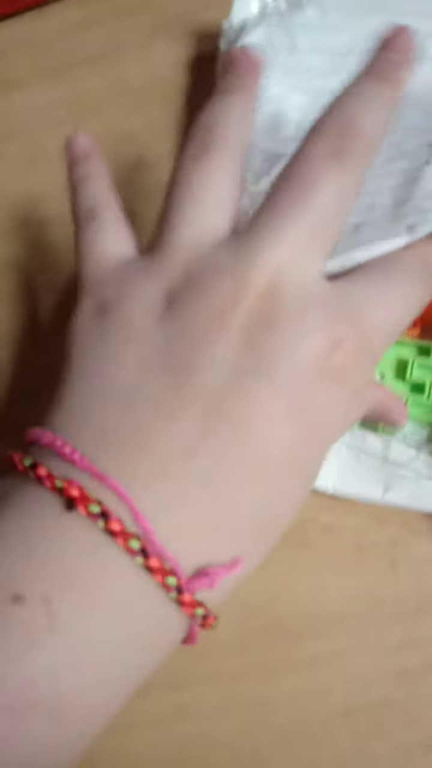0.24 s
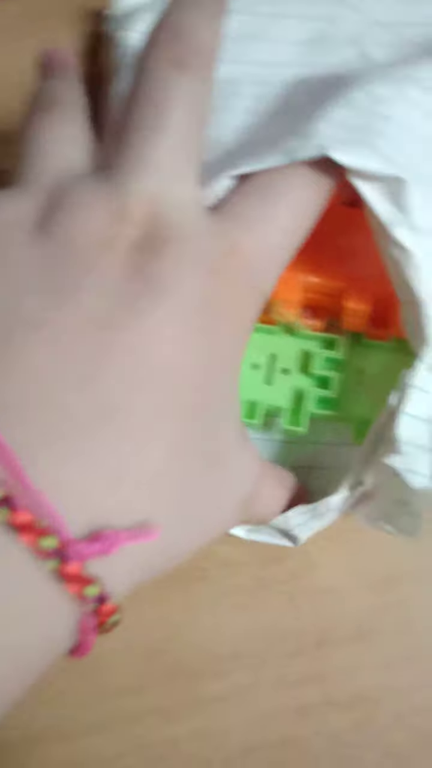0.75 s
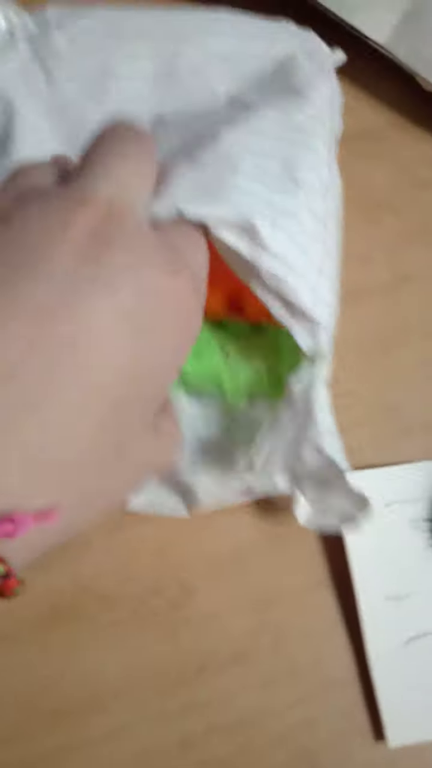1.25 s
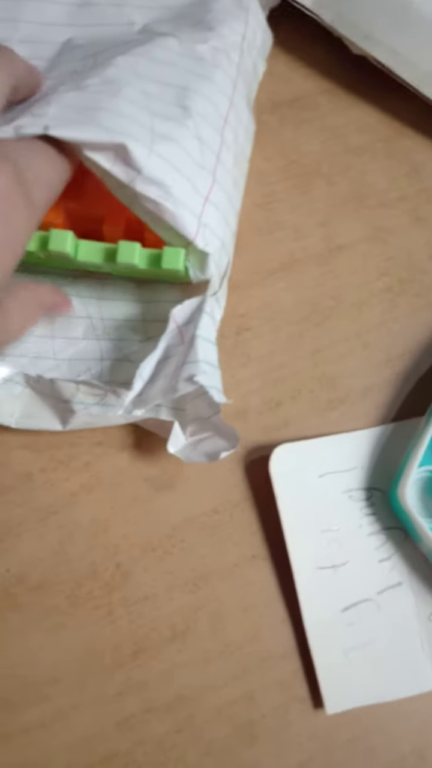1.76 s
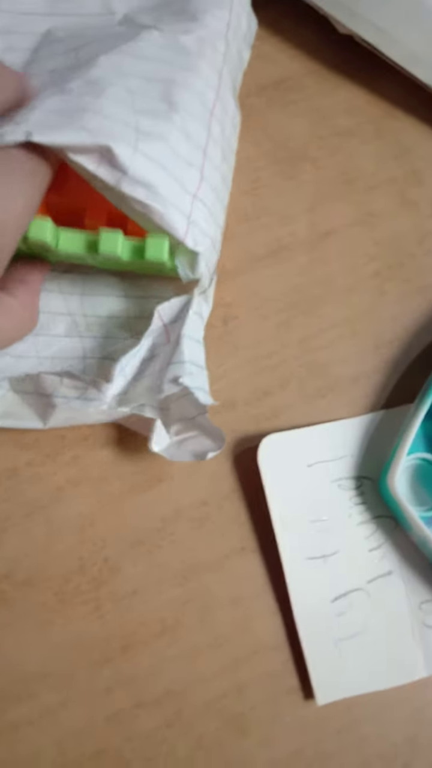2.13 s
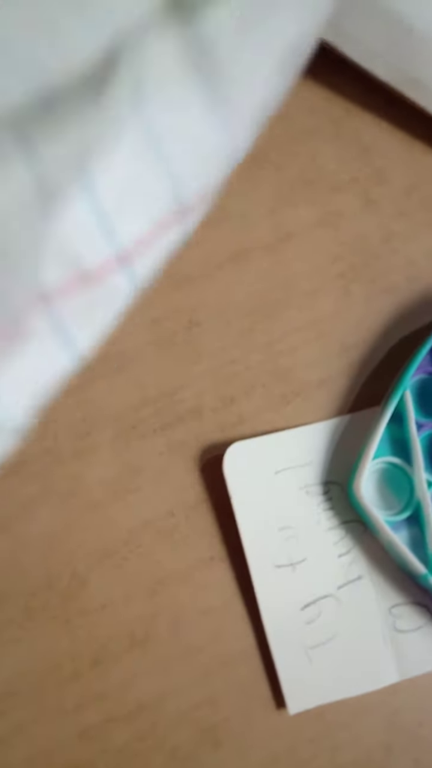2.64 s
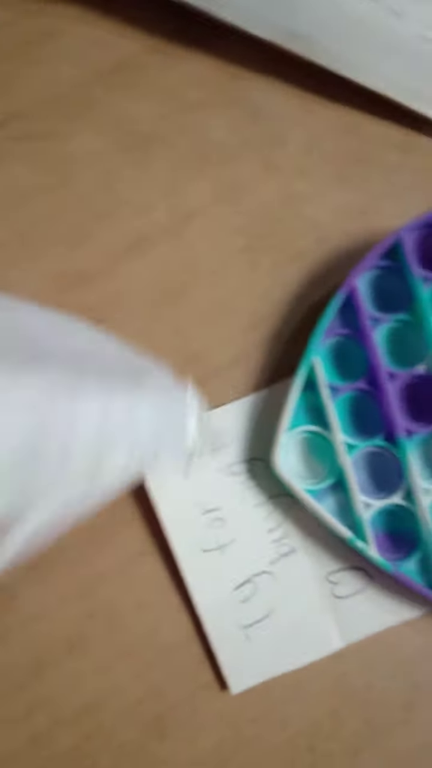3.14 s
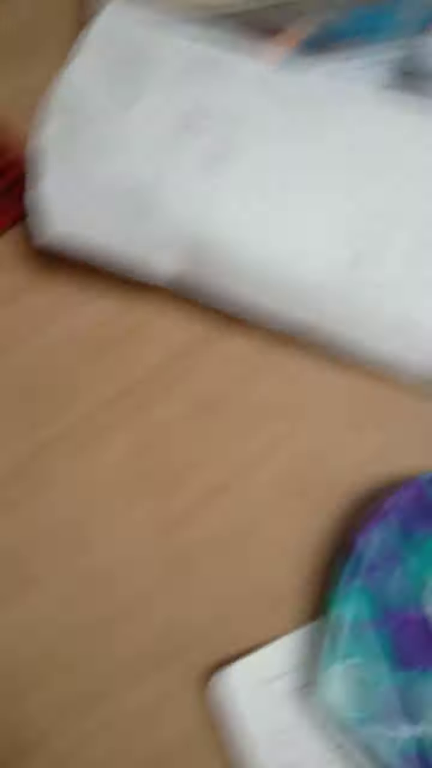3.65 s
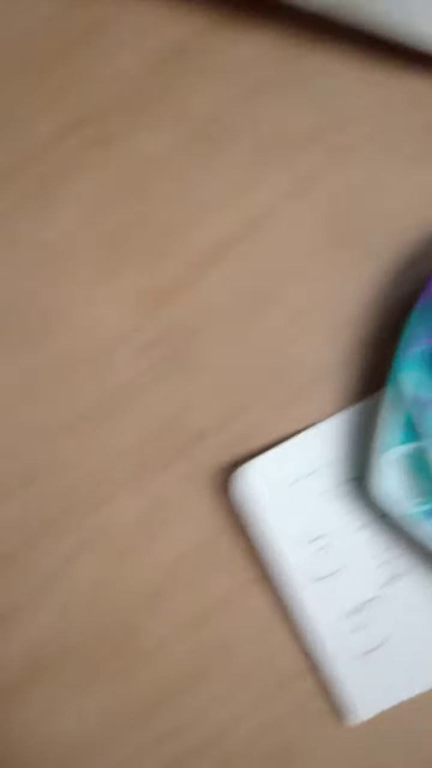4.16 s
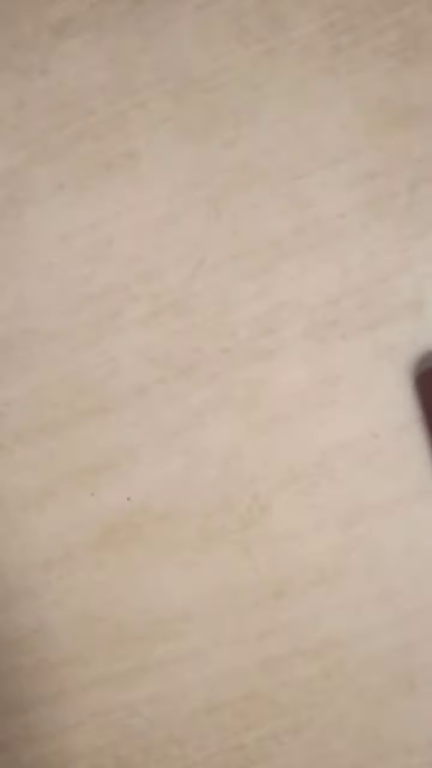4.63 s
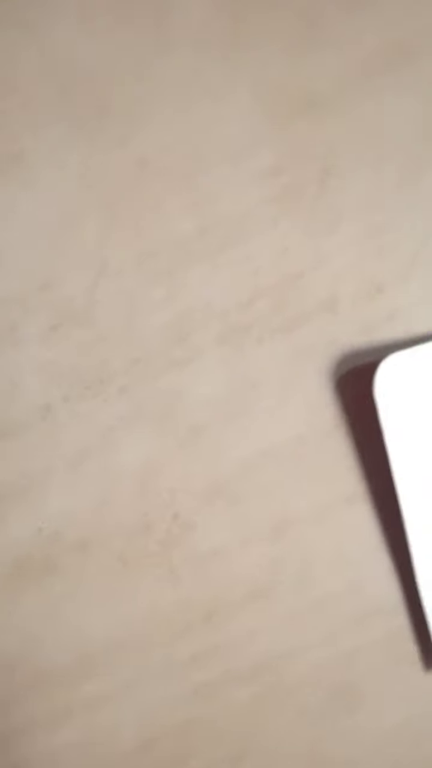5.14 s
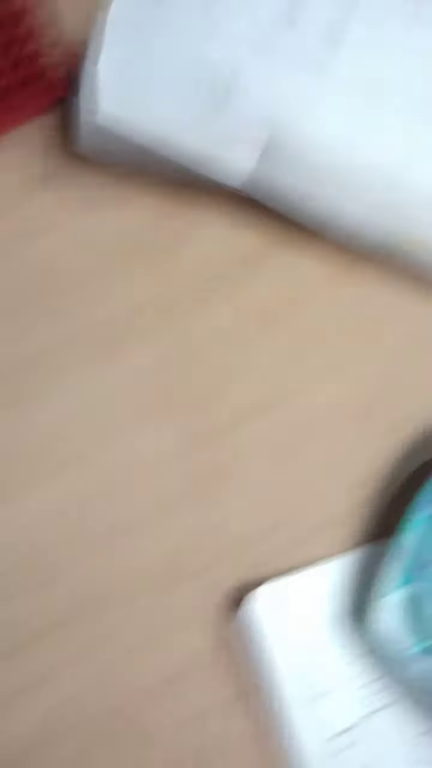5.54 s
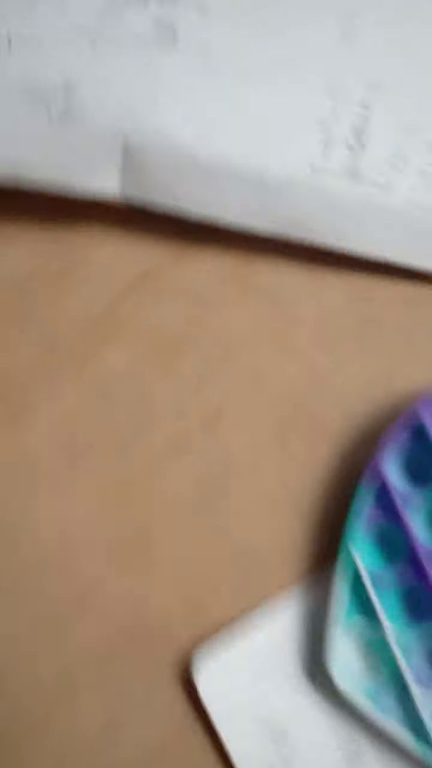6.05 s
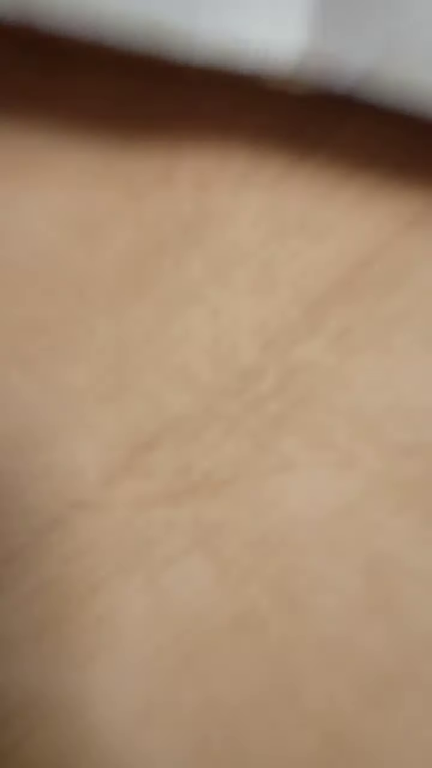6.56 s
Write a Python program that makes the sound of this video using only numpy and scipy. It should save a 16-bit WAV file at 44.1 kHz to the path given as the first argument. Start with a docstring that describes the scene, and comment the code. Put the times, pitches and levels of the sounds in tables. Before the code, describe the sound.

A hand rummages in a lined-paper packet holding hard plastic toys: faint, dry rubs, fine crackles and a few hollow plastic clicks. A near-quiet lull follows around two seconds. Then the packet moves close to the phone and becomes far louder, with sharp crease snaps, dense crinkling and low soft thumps. Quiet furnished room, dull narrow phone sound with little echo.

```python
"""Dry paper rustles and crackles as a hand rummages in a home-made packet of plastic toys;
from 3.7 s the packet is moved about on a table close to a phone, nearer and heavier.
Sliding paper is dense tiny slips, buckling creases are cracks with damped modes, knocking toys are
pairs of modes with a tick, and the packet's soft walls thump as low swings that sag in pitch.
An edge swishes over the table once; a short room tail and a low room tone lie behind."""
import sys
import numpy as np
from scipy import signal
from scipy.fft import rfft, irfft, next_fast_len
from scipy.io import wavfile
from scipy.ndimage import uniform_filter1d, map_coordinates

SR = 44100
rng = np.random.default_rng(int(sys.argv[2]) if len(sys.argv) > 2 else 0)


def inscribe(sig):
    """Save sig as 16-bit PCM at rate SR to the path in sys.argv[1].

    A 1-D sig is mono; a 2-D sig holds one channel per row.
    Samples are clipped to [-1, 1] before scaling.
    """
    pcm = np.round(np.clip(np.atleast_2d(sig).T, -1, 1) * 32767)
    wavfile.write(sys.argv[1], SR, pcm.astype(np.int16))


N = 299439
TIME = np.arange(N) / SR

# faint contact of a hand that never quite lets go: start_s, rustle_db, hiss_db, flutter_db
CONTACT = [(0.0, -56, -64, -62), (0.35, -51.5, -59, -63.5), (0.55, -62.5, -73, -62),
           (0.72, -54.5, -65, -56), (0.95, -61.5, -85, -58.5), (1.15, -49, -61, -57.5),
           (1.52, -56, -74, -57), (1.78, -73, -88, -69.5), (2.04, -74, -93, -75), (2.2, -58.5, -68, -58.5),
           (2.5, -71.5, -87, -71), (2.85, -56, -70, -62), (3.35, -65.5, -70, -63.5),
           (3.851, -48.5, -54, -44.5), (4.6, -55, -62, -46.5), (5.3, -49.5, -52, -45),
           (6.0, -65, -75.5, -59.5), (6.27, -58, -67, -58), (6.45, -64, -52.5, -49),
           (6.79, -49, -63, -46.5)]
# strokes of the hand, each one rub or crumple:
# start_s, length_s, swell_db (over the length), rustle_db, hiss_db, flutter_db
STROKES = [ (0.091, 0.085, -6.5, -52, -69, -59.5), (0.25, 0.087, -4, -51, -71, -74),
           (0.427, 0.023, -4, -47.5, -53.5, -53.5), (0.619, 0.043, 7, -48.5, -59, -54),
           (0.795, 0.068, -3.5, -53.5, -78, -54), (1.046, 0.06, -3, -42.5, -59, -48),
           (1.202, 0.18, -2, -44.5, -57.5, -62), (1.478, 0.12, -3, -53, -66.5, -63),
           (2.15, 0.062, -6, -53, -66, -63.5), (2.34, 0.023, 0.5, -53.5, -72, -58.5),
           (2.665, 0.15, 6.5, -53, -68, -58), (2.849, 0.086, -12, -50, -60, -53.5),
           (3.017, 0.088, -5, -55, -64.5, -63), (3.239, 0.068, 7, -53.5, -62, -71),
           (3.388, 0.016, -13, -41.5, -52, -34.5), (3.411, 0.079, 0.5, -42.5, -47.5, -43),
           (3.596, 0.12, -11, -61, -59, -45.5), (3.758, 0.019, -16.5, -35, -55, -35),
           (3.807, 0.039, 10, -40.5, -63, -39.5), (3.924, 0.037, -6, -44.5, -46, -37.5),
           (4.02, .15, 14.5, -40, -48.5, -46.5), (4.261, 0.024, -8, -46, -64, -28),
           (4.394, 0.11, -1.5, -35, -45.5, -30), (4.647, 0.053, -5, -45, -55.5, -42),
           (4.767, 0.086, -6, -44.5, -53, -35.5), (4.89, 0.11, -0.5, -40.5, -44.5, -41),
           (5.06, 0.13, -2.5, -40, -49.5, -36), (5.215, 0.13, 3, -39.5, -44, -41),
           (5.423, 0.11, -6, -41, -43, -40.5), (5.489, 0.079, 14, -34.5, -50, -30.5),
           (5.637, 0.037, 3, -33, -38.5, -32), (5.711, 0.12, -1.5, -37.5, -49.5, -39.5),
           (5.886, 0.026, 5.5, -46, -48.5, -48), (6.115, 0.084, -5.5, -41, -47, -39),
           (6.324, 0.1, -16, -38, -50, -37), (6.472, 0.097, -4.5, -46, -45, -47.5),
           (6.593, 0.054, -15, -38.5, -48.5, -31.5)]
# tone of paper rubbed by fingers inside the packet: outline_hz, level_db
INSIDE_COLOUR = [(400, -8.5), (750, -4), (1400, 0), (2000, 2), (2850, -3.5), (3400, -6), (4200, -6.5),
                 (4900, -33.5)]
# tone of paper moved near the phone: outline_hz, level_db
OUTSIDE_COLOUR = [(400, -8.5), (620, 8), (900, 4.5), (1400, 7.5), (1850, 3.5), (2300, 6.5), (2950, -6.5),
                  (3500, -2.5), (4150, 0.5), (4900, -28.5)]
# tone of the sliding hiss: outline_hz, level_db
HISS_COLOUR = [(3600, -5), (4200, 0), (5200, -3.5), (5900, 0), (6500, 1), (7300, 3.5), (7800, -0.5)]
# tone of the whole sheet fluttering: outline_hz, level_db
FLUTTER_COLOUR = [(30, -12.5), (70, -38), (98, -14), (130, -0.5), (165, 0), (230, -4), (310, -4.5),
                  (600, -7.5), (900, -20.5)]
# loudest creases snapping: start_s, ring_db (rms over 5 ms), ring_hz, ring_t60_s, crack_db (rms over 5 ms)
CREASES = [(0.111, -42, 1230, 0.0093, -60), (0.259, -42.5, 4100, .008, -54),
           (0.3128, -36, 2360, 0.015, -36.5), (0.6485, -38.5, 3700, 0.013, -35.5),
           (0.6554, -35.5, 3980, 0.0036, -32), (0.859, -41, 875, 0.0089, -69),
           (0.952, -50.5, 1620, .009, -66), (1.082, -37.5, 870, 0.012, -54),
           (1.2030, -33, 2500, 0.0013, -49), (1.2145, -33, 1350, 0.016, -54),
           (1.2426, -32.5, 1530, 0.0087, -62), (1.5147, -43, 4050, 0.014, -75),
           (2.186, -50.5, 3900, .006, -61), (2.7384, -43.5, 3120, 0.01, -60),
           (2.7428, -38.5, 2600, .007, -56), (2.8023, -40, 2320, 0.0088, -58),
           (2.8323, -32.5, 1690, 0.04, -43), (3.0097, -37.5, 2400, 0.0062, -42),
           (3.0168, -42.5, 2700, 0.011, -50), (3.3713, -35, 2590, 0.025, -50),
           (3.383, -30.5, 1340, .014, -54), (3.3904, -35, 1620, 0.013, -29.5),
           (3.6399, -27, 1270, 0.012, -70), (3.6938, -30, 1290, 0.013, -59),
           (3.7417, -31, 990, 0.018, -30.5), (3.7577, -24, 996, 0.021, -24.5),
           (3.8293, -35, 2290, 0.018, -23), (3.9918, -32.5, 2940, 0.0071, -47),
           (4.0045, -24, 1290, 0.013, -25), (4.097, -28, 524, 0.023, -51.5),
           (4.1142, -28.5, 1590, .02, -25.5), (4.1389, -32, 3370, 0.0044, -28),
           (4.1561, -26.5, 1500, 0.01, -27), (4.1671, -27.5, 3500, 0.0086, -41),
           (4.2005, -33, 960, 0.0051, -23), (4.2484, -27, 950, 0.0088, -58),
           (4.2609, -19, 3330, 0.007, -24.5), (4.2622, -19.5, 954, .006, -47.5),
           (4.2685, -29, 1030, 0.0047, -36), (4.2788, -33, 1410, 0.0022, -36),
           (4.2852, -28, 1590, 0.0037, -37), (4.4269, -28, 3690, 0.011, -28),
           (4.4325, -26.5, 1500, 0.03, -29), (4.4715, -16.5, 1300, 0.016, -18),
           (4.5081, -26, 1140, 0.0066, -31), (4.5182, -27.5, 1460, 0.0059, -54),
           (4.557, -42, 1080, 0.012, -33), (4.5756, -24, 1330, 0.013, -24),
           (4.6536, -28.5, 1095, 0.008, -60), (4.713, -39, 4700, 0.0042, -52),
           (4.7952, -18, 2515, 0.0074, -22), (4.799, -21.5, 2370, 0.00067, -40),
           (4.8202, -32, 1500, 0.0048, -41), (4.9117, -19, 1350, 0.0082, -20),
           (4.9388, -24.5, 1310, 0.026, -61), (5.0245, -29, 1300, 0.0069, -69),
           (5.0598, -28.5, 1180, 0.0037, -43), (5.074, -22, 970, 0.0073, -58),
           (5.101, -37.5, 3650, 0.0028, -38), (5.1456, -29.5, 910, 0.0083, -35),
           (5.1602, -22.5, 1840, 0.0033, -45), (5.1748, -33, 3800, 0.004, -46),
           (5.1927, -32.5, 2070, .005, -49), (5.2525, -30.5, 2140, 0.0079, -44),
           (5.309, -32.5, 1620, 0.022, -24), (5.41, -36.5, 7000, 0.0088, -50),
           (5.4275, -30.5, 3700, 0.0094, -52), (5.5635, -21, 1070, 0.0071, -27),
           (5.5705, -26.5, 2270, 0.015, -35), (5.6205, -28, 1540, 0.013, -48),
           (5.7299, -24.5, 3870, 0.0091, -25.5), (5.79, -34.5, 2200, 0.0057, -42),
           (5.8296, -29.5, 1230, 0.0052, -36), (6.048, -45, 7400, 0.014, -58),
           (6.114, -30, 1330, 0.028, -24.5), (6.202, -35.5, 2730, 0.0067, -55),
           (6.2202, -43, 2850, 0.0055, -28.5), (6.3217, -26.5, 1400, 0.015, -29),
           (6.3891, -30.5, 1050, 0.018, -46), (6.4806, -30.5, 1130, 0.015, -60),
           (6.554, -30.5, 3460, 0.012, -62), (6.6076, -30, 910, 0.016, -28.5),
           (6.6392, -30, 734, 0.019, -32), (6.7855, -24, 762, 0.054, -66)]
# rigid toys knocking together inside the packet: start_s, knock_db (rms over 5 ms), main_hz, t60_s,
# upper_hz, upper_db (relative to the main mode), tick_db (rms over 5 ms)
KNOCKS = [(0.8292, -26, 1950, 0.0064, 3550, -6.5, -69), (1.0423, -33, 1930, 0.015, 2970, -8, -49),
          (2.683, -28, 1755, 0.013, 2500, -11, -63), (2.7716, -29.5, 2060, 0.0069, 3770, -8, -39),
          (2.8466, -29, 2000, 0.0051, 2840, -5, -43.5)]
# loudest soft wall thumps: start_s, peak_db (before the band-pass), pitch_hz (middle of the sag)
THUMPS = [(3.384, -22.5, 190), (3.755, -26, 215), (3.843, -27, 180), (3.934, -18.5, 140), (3.963, -13, 158),
          (4.01, -26, 200), (4.185, -23.5, 236), (4.233, -16, 236), (4.248, -13.5, 210),
          (4.265, -16.5, 220), (4.282, -12, 260), (4.44, -12.5, 304), (4.5, -12.5, 173),
          (4.516, -14.5, 355), (4.575, -11.5, 324), (4.652, -12.5, 300), (4.781, -19, 231),
          (4.835, -18, 179), (4.857, -23, 191), (4.939, -21.5, 258), (4.973, -13.5, 322), (5.144, -24, 260),
          (5.518, -17, 160), (5.532, -25, 198), (5.552, -13.5, 360), (5.577, -14.5, 204), (5.602, -23, 215),
          (5.654, -18, 350), (5.778, -30, 150), (5.831, -20, 246), (6.322, -22.5, 197), (6.387, -21, 268),
          (6.479, -24, 234), (6.605, -14.5, 296), (6.613, -14, 142), (6.783, -22.5, 285)]
# tone of the quiet room: outline_hz, level_db
ROOM_COLOUR = [(30, -22.5), (120, -9.5), (180, 5), (350, -8.5), (1400, -8.5), (2500, -22), (7800, -42)]

LIFT_S = 3.7  # the packet comes close from here on
TOP_HZ = 7800  # top of the phone's band
GRIP_DB_PER_S, LET_GO_DB_PER_S = 902.5, 678  # how fast a stroke starts and dies away
INSIDE_EASE = 0.7  # fingers inside the packet let go at this share of that speed
FAR_BASS_HZ = 150  # away from the phone the flutter loses its bass below this
# lesser creases: rate per second, level relative to the rustle, scatter either way, crack below the ring
STRAY_RATE, STRAY_DB, STRAY_SCATTER_DB, STRAY_DULL_DB = 40, -2, 2.5, 9
STRAY_LOW_HZ, STRAY_HIGH_HZ, STRAY_T60_S = 1480, 4280, 0.005
SWISH_START_S, SWISH_END_S = 3.40, 3.51
SWISH_FIRST_HZ, SWISH_LAST_HZ, SWISH_DB = 7100, 5410, -42


def handling():
    """Rustle, hiss and flutter levels in dB: strokes grip, swell or fade and let go over a light contact."""
    t = np.linspace(0, TIME[-1], 7000)  # coarse time grid
    contact_s, *contact_levels = np.transpose(CONTACT)
    power = np.array([undb(np.interp(t, contact_s, db)) ** 2 for db in contact_levels])
    for start, length, swell_db, *levels_db in STROKES:
        swell = swell_db * (np.clip((t - start) / length, 0, 1) - .5)
        let_go = LET_GO_DB_PER_S * (INSIDE_EASE if start < LIFT_S else 1)
        before = GRIP_DB_PER_S * np.maximum(start - t, 0)
        after = let_go * np.maximum(t - start - length, 0)
        power += undb(np.add.outer(levels_db, swell - before - after)) ** 2
    return [np.interp(TIME, t, 10 * np.log10(p)) for p in power]


def rustle(paper_db, hiss_db, flutter_db):
    """Slips and crinkles drive the paper's body and its hiss together; the whole sheet flutters below."""
    near = np.clip((TIME - LIFT_S) * 20, 0, 1)  # 50 ms crossfade
    far = 1 - near
    # fingers inside the packet rub finely
    rubbing = slips(rate=2000, spread_db=2.0, smooth=0.63)
    rubbing = unit(flex(rubbing, depth_db=3.5, rate=27))
    # once lifted, the paper crinkles and slips in separate jerks
    facets = crinkle(rate=850, spread_db=3.0, cycles=0.56)
    jerks = slips(rate=330, spread_db=1.5, smooth=0.64)
    crinkling = unit(flex(facets + jerks, depth_db=2.0, rate=23))
    paper = far * unit(colour(rubbing, INSIDE_COLOUR)) + near * unit(colour(crinkling, OUTSIDE_COLOUR))

    fibres = unit(flex(rng.standard_normal(N), depth_db=1.0, rate=48))
    hiss = unit(colour(far * rubbing + near * crinkling + fibres, HISS_COLOUR))

    flutter = unit(colour(slips(rate=440, spread_db=2.5, smooth=0.39), FLUTTER_COLOUR))
    flutter = unit(flutter * undb(1.96 * walk(55)))  # the sheet flaps in fits, with lulls between
    flutter = near * flutter + far * band(flutter, FAR_BASS_HZ, 2000)

    # the fingers catch and let go, so slips come in clusters
    grip = unit(undb(1.5 * walk(90) + 1.3 * walk(300)))
    sheet = grip * (paper * undb(paper_db) + hiss * undb(hiss_db))
    return table_echo(sheet) + flutter * undb(flutter_db)


def slips(rate, spread_db, smooth):
    """Stick-slip of paper: many tiny jerks and a few bigger ones, over smooth fibre friction."""
    size = undb(spread_db * np.minimum(rng.exponential(size=N), 4))
    happens = rng.random(N) < rate / SR
    jerks = happens * size * rng.choice([-1, 1], N)
    return unit(jerks) + smooth * rng.standard_normal(N)


def crinkle(rate, spread_db, cycles, count=16):
    """Countless small facets flip at random; each rings briefly at one of a set of pitches."""
    out, t = np.zeros(N), TIME[:512]
    for hz in np.geomspace(700, 7500, count):
        when, size, sign = rng.random((int(rate * N / SR / count), 3)).T
        strength = undb(-spread_db * np.log(np.maximum(size, .015)))
        flips = np.zeros(N)
        flips[(when * N).astype(int)] = np.sign(sign - .5) * strength
        age = t * hz / cycles
        grain = np.sin(2 * np.pi * hz * t) * age * np.exp(-age)
        out += np.sqrt(hz) * unit(signal.oaconvolve(flips, grain)[:N])
    return unit(out)


def flex(x, depth_db, rate, count=12):
    """The sheet bends, so each of its resonance regions swells and fades by itself."""
    centres = np.log(np.geomspace(600, TOP_HZ, count))
    size = next_fast_len(N)
    place = np.log(np.maximum(np.fft.rfftfreq(size, 1 / SR), 1))
    spectrum = rfft(x, size)
    out = np.zeros(N)
    for share in np.eye(count):  # overlapping regions that sum to the whole
        region = irfft(spectrum * np.interp(place, centres, share), size)[:N]
        out += region * undb(depth_db * walk(rate))
    return out


def table_echo(x, lag_s=0.000805, sway=0.363, rate=7, strength=0.37):
    """The table top reflects the paper's sound; the gap changes as the packet moves, so notches wander."""
    lag = lag_s * SR * np.exp(sway * walk(rate))  # samples
    late = map_coordinates(x, [np.arange(N) - lag], order=3, mode="nearest")
    return (x + strength * late) / np.sqrt(1 + strength ** 2)


def creases(rows, upper_ratio=1.74, upper_db=-9, rise_s=0.00016, crack_s=0.0011, folds_db=-6):
    """A facet of paper flips: a dry crack, and two heavily damped modes of the facet."""
    out, t = np.zeros(N), TIME[:2048]
    for s, ring_db, hz, t60, crack_db in rows:
        noise = rng.standard_normal((2, len(t)))
        buckle = (1 - np.exp(-t / rise_s)) ** 2
        fade = buckle * decay(t, t60)
        upper_hz = upper_ratio * hz
        # the paper soaks up upper modes above a few kilohertz
        upper = undb(upper_db) / (1 + (upper_hz / 4300) ** 4) * np.sin(2 * np.pi * upper_hz * t)
        modes = burst((np.sin(2 * np.pi * hz * t) + upper) * fade)
        # neighbouring folds of a like size crackle along with it
        folds = burst(band(noise[0] * fade, min(0.42 * hz, 1100), max(3600, 1.59 * hz), order=4))
        ring = burst(modes + undb(folds_db) * folds)
        crack = burst(band(noise[1] * buckle * np.exp(-t / crack_s), 1000, .45 * SR, order=3))
        add(out, s, undb(ring_db) * ring + undb(crack_db) * crack)
    return out


def stray_creases(paper_db):
    """Lesser creases snap at random moments and pitches, their strength following the rustle."""
    when, pitch, size = rng.random((int(STRAY_RATE * N / SR), 3)).T
    start_s = when * TIME[-1]
    ring_db = np.interp(start_s, TIME, paper_db) + STRAY_DB + STRAY_SCATTER_DB * (2 * size - 1)
    ring_hz = STRAY_LOW_HZ * (STRAY_HIGH_HZ / STRAY_LOW_HZ) ** pitch
    rows = [(s, db, hz, STRAY_T60_S, db - STRAY_DULL_DB) for s, db, hz in zip(start_s, ring_db, ring_hz)]
    return creases(rows)


def knocks(rise_s=0.00071, tick_s=0.00072, chatter_db=-10):
    """Hollow plastic parts touch: a tiny tick, two quickly damped modes, and chatter of many weaker ones."""
    out, t = np.zeros(N), TIME[:2048]
    contact = (1 - np.exp(-t / rise_s)) ** 2
    for s, db, hz, t60, upper_hz, upper_db, tick_db in KNOCKS:
        noise = rng.standard_normal((2, len(t)))
        fade = contact * decay(t, t60)
        upper = undb(upper_db) * np.sin(2 * np.pi * upper_hz * t)
        modes = burst((np.sin(2 * np.pi * hz * t) + upper) * fade)
        chatter = burst(band(noise[0] * fade, 1480, upper_hz, order=3))
        body = burst(modes + undb(chatter_db) * chatter)
        tick = burst(band(noise[1] * contact * np.exp(-t / tick_s), 4800, 7100))
        add(out, s, undb(db) * body + undb(tick_db) * tick)
    return out


def thumps(rise_cycles=0.69, peak_s=0.0019, sag=0.1, crackle_db=-23):
    """A packet wall gives way: low swings swell, slow and die as it relaxes, while small folds crackle."""
    out, bending, t = np.zeros(N), np.zeros(N), TIME[:2048]
    for s, db, hz in THUMPS:
        rise_s = rise_cycles / hz  # slacker walls swing longer
        age = t / rise_s
        bulge = undb(db) * (age * np.exp(1 - age)) ** 2
        pitch = hz * (1 + sag * (np.exp(-age) * 2 - 1))
        begin_s = s + peak_s - rise_s  # every bulge peaks peak_s after its listed time
        add(out, begin_s, bulge * np.sin(2 * np.pi * np.cumsum(pitch) / SR))
        add(bending, begin_s, bulge)
    folds = unit(band(slips(rate=810, spread_db=3, smooth=0), 370, 1700))
    return band(out, 107.3, 2500, order=4) + undb(crackle_db) * bending * folds


def swish(half_width_hz=700):
    """The packet's edge slides over the table: a narrow hiss that falls as it slows."""
    span_s = (SWISH_START_S, SWISH_END_S)
    along = np.interp(TIME, span_s, (0, 1))
    hz = np.interp(TIME, span_s, (SWISH_FIRST_HZ, SWISH_LAST_HZ))
    carrier = np.sin(2 * np.pi * np.cumsum(hz) / SR)
    hiss = unit(band(rng.standard_normal(N), 15, half_width_hz) * carrier)
    return undb(SWISH_DB) * np.sin(np.pi * along) * hiss


def room(x, t60=0.23, wet_db=-21.0):
    """A faint short tail from the walls of a furnished room: decaying noise as its response."""
    t = TIME[:16384]
    tail = band(rng.standard_normal(len(t)), 200, 13000, order=1)
    tail *= decay(t, t60) * (t > .004)  # the first 4 ms stay dry
    tail /= np.sqrt(np.sum(tail ** 2))
    return x + undb(wet_db) * signal.fftconvolve(x, tail)[:N]


def room_tone():
    """Steady low noise of the quiet room, shaped by its outline."""
    return undb(-63.5) * unit(colour(rng.standard_normal(N), ROOM_COLOUR))


def undb(db):
    """Decibels to gain."""
    return 10 ** (np.asarray(db) / 20)


def unit(x):
    """Scale to rms 1."""
    return x / np.sqrt(np.mean(x ** 2))


def burst(x):
    """Scale a click so that its energy equals rms 1 over 5 ms."""
    return x / np.sqrt(np.sum(x ** 2) / (.005 * SR))


def decay(t, t60):
    """Exponential fade that loses 60 dB in t60 seconds."""
    return np.exp(-np.log(1000) * t / t60)


def add(out, s, sound):
    """Mix a short sound in at time s."""
    i = max(int(s * SR), 0)
    out[i:i + len(sound)] += sound[:max(N - i, 0)]


def walk(rate):
    """Smooth random drift with an rms of 1, heading for a new value rate times a second."""
    k = int(SR / rate)
    steps = np.repeat(rng.standard_normal(N // k + 1), k)
    return unit(uniform_filter1d(steps, k)[:N])


def band(x, lo_hz, hi_hz, order=2):
    """Causal band-pass."""
    return signal.sosfilt(signal.butter(order, [lo_hz, hi_hz], "band", fs=SR, output="sos"), x)


def colour(x, points, size=4096):
    """Causal minimum-phase filter with an outline in Hz and dB, built by folding its cepstrum."""
    hz, db = np.transpose(points)
    f = np.maximum(np.fft.rfftfreq(size, 1 / SR), 1)
    beyond = np.abs(np.log2(f / np.clip(f, hz[0], hz[-1])))  # octaves outside the outline
    outline_db = np.interp(np.log(f), np.log(hz), db) - 24 * np.minimum(beyond, 2)
    cepstrum = irfft(np.log(undb(outline_db)))
    cepstrum[1:size // 2] *= 2
    cepstrum[size // 2 + 1:] = 0
    response = irfft(np.exp(rfft(cepstrum)))
    return signal.fftconvolve(x, response)[:len(x)]


def scene():
    """The packet in the room, over a low room tone."""
    paper_db, hiss_db, flutter_db = handling()
    packet = rustle(paper_db, hiss_db, flutter_db)
    packet += creases(CREASES) + stray_creases(paper_db)
    packet += knocks() + thumps() + swish()
    return (room(packet) + room_tone())[None]


def record(dry):
    """The phone rounds the loudest peaks and keeps nothing above its narrow speech band."""
    taps = signal.firwin(401, TOP_HZ, window=("kaiser", 6), fs=SR)
    return signal.fftconvolve(np.tanh(dry), taps[None], mode="same", axes=1)


dry = scene()
out = record(dry)
inscribe(out)
```